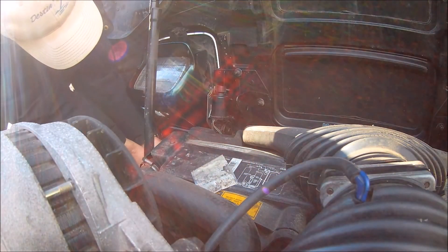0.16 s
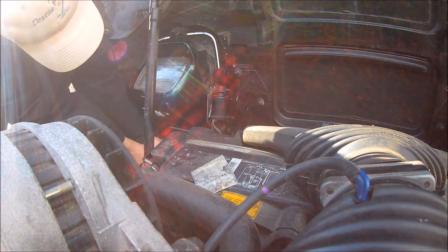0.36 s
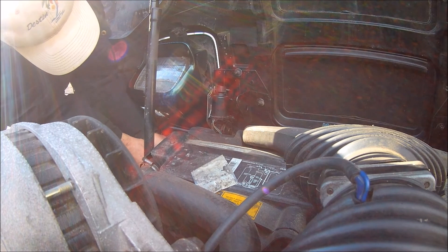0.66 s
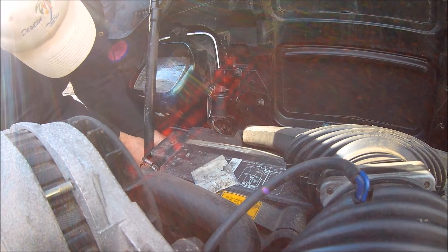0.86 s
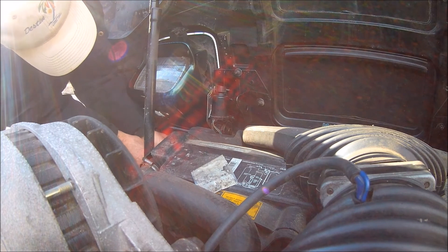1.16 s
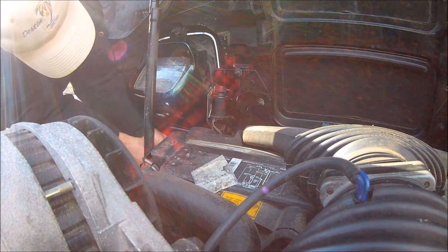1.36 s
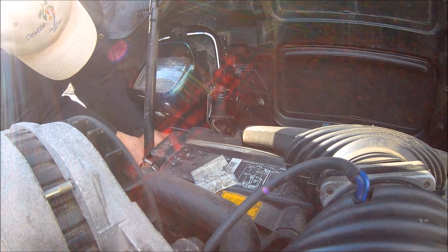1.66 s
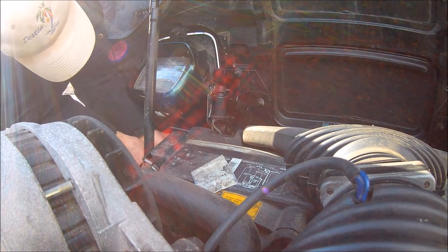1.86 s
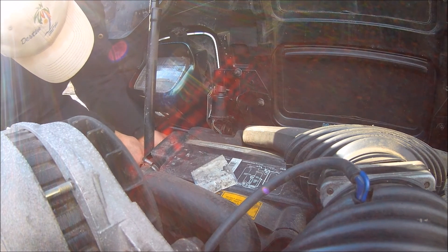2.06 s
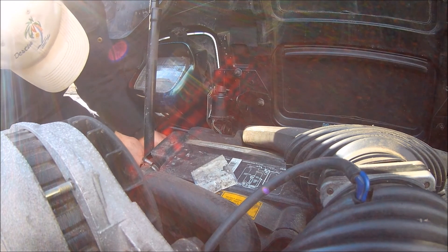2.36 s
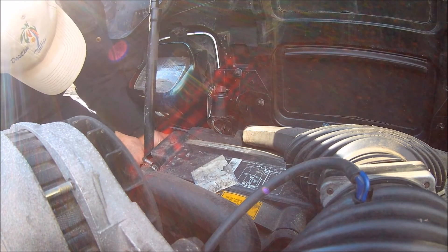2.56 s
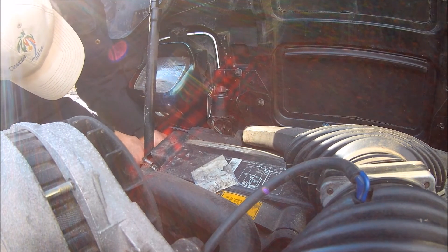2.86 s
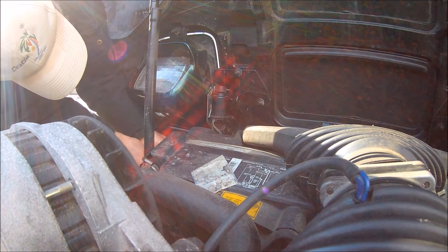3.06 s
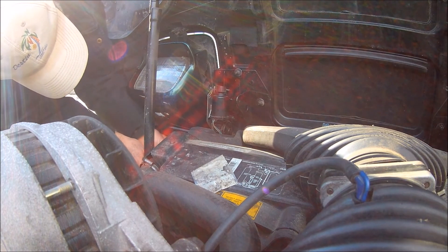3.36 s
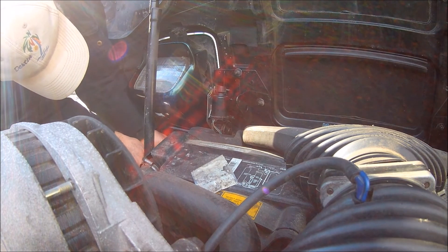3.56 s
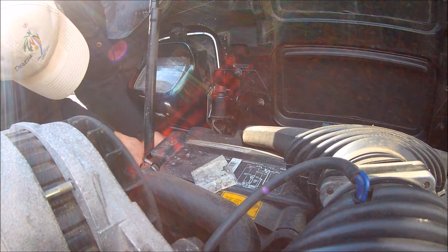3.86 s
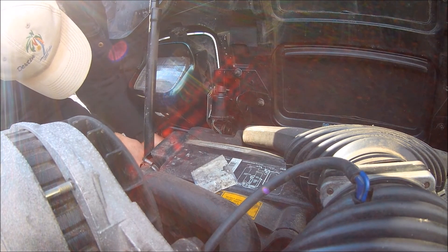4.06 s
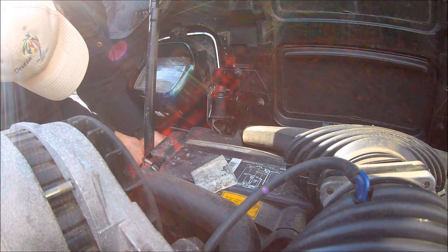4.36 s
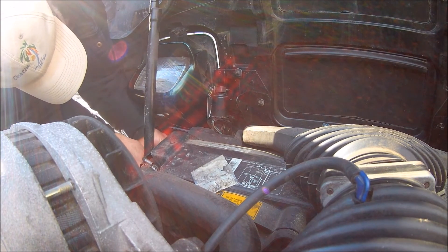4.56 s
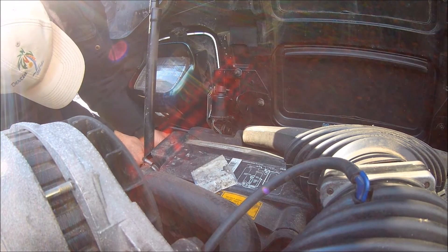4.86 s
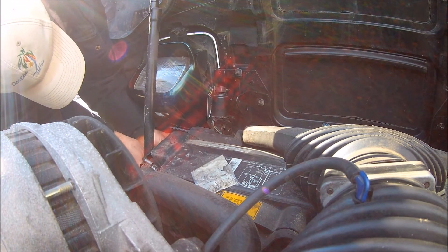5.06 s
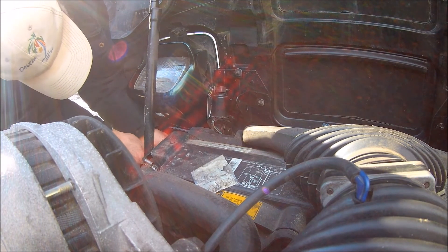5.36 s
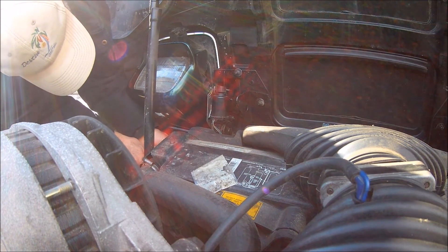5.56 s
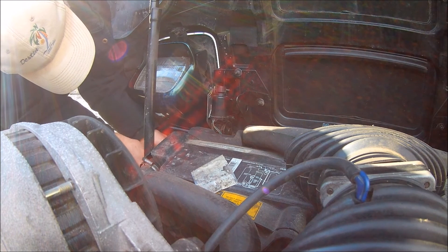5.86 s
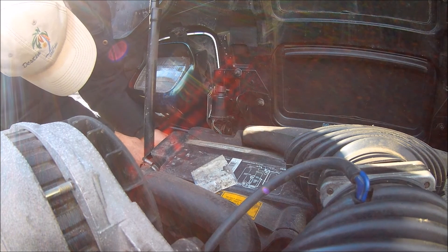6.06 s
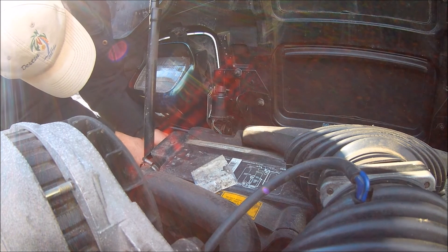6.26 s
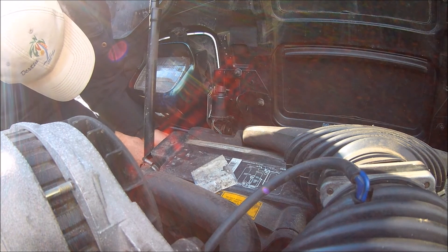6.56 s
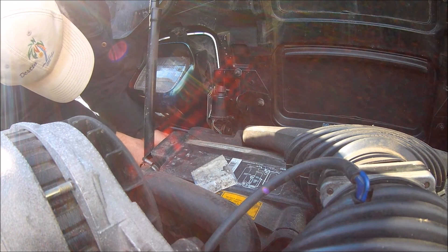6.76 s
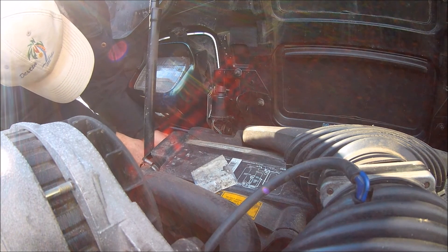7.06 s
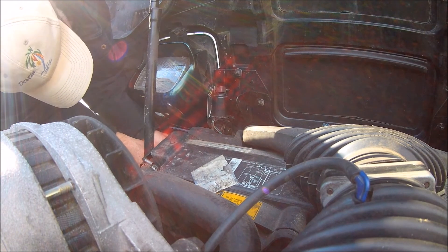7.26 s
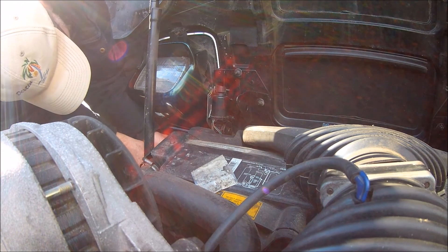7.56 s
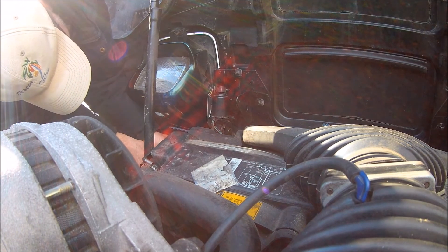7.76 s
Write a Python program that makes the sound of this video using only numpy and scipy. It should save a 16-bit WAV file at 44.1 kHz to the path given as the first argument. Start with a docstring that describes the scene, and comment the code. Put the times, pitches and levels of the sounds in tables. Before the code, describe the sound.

Irregular metal clanks and softer thuds of a socket wrench, with rapid pawl clicks before many strokes, close up above faint rumble and air gusts.

```python
"""In a truck's engine bay in a garage, a ratchet wrench tightens bolts.
On each back swing the pawl ticks over the teeth: short noise snaps plus a few ringing modes.
The socket knocks on steel, rubs on the bolt head and bumps the body: clicks set many fading tones ringing.
Behind it: a dull rumble of filtered noise, a faint wavering hum and low gusts of air on the microphone."""
import sys
import numpy as np
from scipy import signal
from scipy.io import wavfile

SR = 44100
rng = np.random.default_rng(int(sys.argv[2]) if len(sys.argv) > 2 else 0)


def dump(signal):
    """Clip the signal to [-1, 1] and save it as 16-bit WAV at the path in sys.argv[1]."""
    limited = np.clip(np.atleast_2d(signal).T, -1, 1)
    pcm = np.round(limited * 32767).astype(np.int16)
    wavfile.write(sys.argv[1], SR, pcm)


N = 349272   # length in samples
CUTOFF_HZ = 12000   # the whole sound is cut above this


def from_db(db):
    """Turn decibels into a plain factor."""
    return 10 ** (np.asarray(db) / 20)


def rms_one(x):
    """Scale a signal to rms 1."""
    return x / np.sqrt(np.mean(x ** 2) + 1e-20)


def at_hz(points, hz):
    """Read a table of (f, value) between its points, on a log-frequency axis."""
    table_hz, values = np.array(points).T
    return np.interp(np.log(hz), np.log(table_hz), values)


def drift(rate):
    """Slow random wandering of rms 1, with two random points per cycle of the rate in Hz."""
    knots = rng.standard_normal(int(N / SR * rate * 2) + 3)
    position = np.arange(N) / SR * rate * 2
    return rms_one(np.interp(position, np.arange(len(knots)), knots))


def surge(start_s, attack_s, fade_s):
    """An envelope that rises to 1 and then dies away, by 1/e in each fade time."""
    age = np.arange(N) / SR - start_s
    return np.clip(age / attack_s, 0, 1) * np.exp(-np.maximum(age - attack_s, 0) / fade_s)


def clicks(times, sizes):
    """One impulse for each contact."""
    out = np.full(N, 1e-18)   # a tiny floor keeps the filters fast
    index = np.clip(np.round(np.ravel(times) * SR).astype(int), 0, N - 1)
    np.add.at(out, index, np.ravel(sizes))
    return out


def ring(x, hz, t60):
    """A resonance: a unit click starts a sine of about height 1 that falls by 60 dB in t60 seconds."""
    r = np.exp(-np.log(1000) / (t60 * SR))
    w = 2 * np.pi * hz / SR
    return signal.lfilter([0, np.sin(w)], [1, -2 * r * np.cos(w), r * r], x)


def swell(energy, rise_s):
    """Energy takes a moment to spread through the metal."""
    r = np.exp(-1 / (rise_s * SR))
    return signal.lfilter([1 - r], [1, -r], energy)


def dying(energy, t60):
    """Amplitude envelope of energy that is put in by clicks and leaks away."""
    keep = np.exp(-2 * np.log(1000) / (t60 * SR))
    return np.sqrt(signal.lfilter([1], [1, -keep], energy))


def noise_bands(spectrum, count):
    """Noise split into bands (f, signal) that follow a spectrum and add up to about rms 1."""
    edges = np.geomspace(spectrum[0][0] / 2 ** (1 / 2), CUTOFF_HZ + 1000, count + 1)
    centres = np.sqrt(edges[1:] * edges[:-1])
    gains = from_db(at_hz(spectrum, centres))
    gains = gains / np.sqrt(np.sum(gains ** 2 * np.diff(edges)) / (SR / 2))
    white = rng.standard_normal((2, N))   # neighbouring bands use different noise
    for k, hz in enumerate(centres):
        band = signal.butter(2, edges[k:k + 2], "band", fs=SR, output="sos")
        yield hz, gains[k] * signal.sosfilt(band, white[k % 2])


def scattered_hz(low_hz, high_hz, count):
    """Mode frequencies, one somewhere in each equal step."""
    return low_hz + (high_hz - low_hz) * (np.arange(count) + rng.random(count)) / count


# colour of the garage rumble: (f/Hz, relative level/dB per Hz)
RUMBLE_SPECTRUM = [(15, -21.5), (25, -4.5), (156, -2), (243, -11), (262, -9), (298, 0.5), (331, -11.5),
                   (451, -5.5), (500, -10.5), (569, -3.5), (648, -7.5), (954, -10), (1170, -17.5),
                   (2240, -46), (12000, -51.5), (15600, -84), (22000, -120)]


def garage(level_db=-42.5, wander_db=0.5, patchy_db=1.5, drone_hz=296, drone_t60=0.15, drone_db=-51.5):
    """Dull rumble of noise bands that each waver, with one low resonance droning in it."""
    bands = noise_bands(RUMBLE_SPECTRUM, count=30)
    rumble = sum(noise * from_db(patchy_db * drift(6)) for hz, noise in bands)
    drone = rms_one(ring(rng.standard_normal(N), drone_hz, drone_t60))
    return from_db(level_db + wander_db * drift(1.2)) * rumble + from_db(drone_db) * drone


# colour of the moving air: (f/Hz, relative level/dB per Hz)
AIR_SPECTRUM = [(18, 2), (35, -6), (60, 3), (100, -9), (200, -2.5)]
# gusts on the microphone: (start t/s, time to fade by 1/e t/s, relative peak level/dB)
GUSTS = [(1.27, 0.5, -32), (1.68, .1, -35.5), (1.87, 0.093, -29), (2.24, .15, -37), (4.47, 0.097, -33),
         (5.75, .15, -37), (7.02, 0.33, -38.5)]
GUST_ATTACK_S = 0.053
CALM_DB, CALM_WANDER_DB = -49.0, 1.5   # relative level: between gusts the air barely moves


def draught(level_db=-0.5, top_hz=130, gust_hz=65, gust_db=-38.5, lumps_db=0.5):
    """Moving air buffets the microphone in lumps; the stronger the gust, the deeper it sounds."""
    air = sum(noise for hz, noise in noise_bands(AIR_SPECTRUM, count=14) if hz < 300)

    def below(hz):
        """The part of the air noise below a frequency, at rms 1."""
        return rms_one(signal.sosfilt(signal.butter(2, hz, fs=SR, output="sos"), air))

    calm, gusty = below(top_hz), below(gust_hz)
    gusts = sum((from_db(db) * surge(start, GUST_ATTACK_S, fade_s)) ** 2 for start, fade_s, db in GUSTS)
    force = np.sqrt(gusts + from_db(CALM_DB + CALM_WANDER_DB * drift(2.7)) ** 2)
    deep = force ** 2 / (force ** 2 + from_db(gust_db) ** 2)   # 0 = calm colour, 1 = deep gust colour
    loudness = force * from_db(level_db + lumps_db * deep * drift(4.4))
    return loudness * ((1 - deep) * calm + deep * gusty)


def hum(hz=75.6, waver=0.013, rest_db=-50.0, swell_db=-38.5):
    """A low sine whose pitch wavers; on top of its resting level it swells once near the end."""
    phase = 2 * np.pi * np.cumsum(hz * (1 + waver * drift(3.7))) / SR
    extra = from_db(swell_db) * surge(start_s=6.85, attack_s=0.3, fade_s=0.37)
    return (from_db(rest_db) + extra) * np.sin(phase)


# the socket rubs on the bolt head: (start t/s, end t/s, relative level/dB)
RUBS = [(3.1, 3.293, -60), (3.655, 3.777, -60), (4.644, 4.852, -52), (5.308, 5.482, -58),
        (5.481, 5.582, -54), (6.055, 6.164, -57), (6.563, 6.67, -54), (6.814, 6.853, -56),
        (7.078, 7.143, -55.5)]
# tones that the rubbing keeps ringing: (f/Hz, relative level/dB, 60 dB fade t/s)
RUB_MODES = [(1300, 8.5, 0.05), (1420, 1.5, 0.11), (1607, 6, 0.064), (1920, 8.5, 0.034), (2140, -2, 0.052),
             (2380, -12.5, 0.11), (2620, -7.5, 0.08)]


def rubbing(slips_per_s=900, level_db=-7.5):
    """Metal slides on metal in tiny uneven slips that keep a few modes ringing; the pressure swells and fades."""
    t = np.arange(N) / SR
    pressure = np.zeros(N)
    for start, end, db in RUBS:
        progress = np.clip((t - start) / (end - start), 0, 1)
        pressure += from_db(db + level_db) * np.sin(np.pi * progress)
    slipping = rng.random(N) < slips_per_s / SR
    slips = pressure * slipping * rng.standard_normal(N) + 1e-18
    return sum((-1) ** k * from_db(db) * ring(slips, hz, t60) for k, (hz, db, t60) in enumerate(RUB_MODES))


# the socket slams home, steel on steel:
# (t/s, relative level/dB, bass level/dB, bite level/dB, treble level/dB, favoured resonance f/Hz)
SLAMS = [(0.471, -19.3, -0.5, 0, -3, 1420), (1.204, -16.5, -3, -0.5, -2, 1136),
         (1.914, -32.5, -12, -7.5, -8, 1180), (2.501, -14.2, -3, -4.5, 1.5, 1030),
         (2.776, -29, 1, -2, -2.5, 1420), (4.269, -15, -3, -3, -2, 1155), (4.851, -30, 0, 0.5, -1.5, 1150),
         (5.45, -17, 0.5, 0, 3, 752), (6.26, -28, 8.5, -2, -3.5, 488), (6.655, -20, 3.5, -3, -8.5, 1430),
         (7.167, -17.5, -1, -1, -3, 1120)]
# the tool bumps softly against the body: (t/s, relative level/dB, treble level/dB)
BUMPS = [(0.947, -52, -24), (2.195, -49.5, -5), (3.286, -49.5, -15), (3.968, -40.5, -11.5),
         (4.478, -42.5, -8), (4.592, -49.5, -19), (5.266, -41.5, -26), (5.493, -37.5, 3), (6.028, -38, -22),
         (6.524, -35, -13), (6.76, -41, -8), (7.045, -40, -21), (7.289, -39.5, -8), (7.704, -40.5, -10.5)]
BUMP_BASS_DB, BUMP_BITE_DB, BUMP_HZ = 13.5, -6, 295   # a soft contact mostly wakes one low resonance


def blows():
    """Slams and soft bumps together, as columns like those of the slams."""
    soft = [(s, db, BUMP_BASS_DB, BUMP_BITE_DB, treble, BUMP_HZ) for s, db, treble in BUMPS]
    return np.transpose(list(SLAMS) + soft)


def blow_strength(hz, accent_db=5.0, accent_octaves=0.17):
    """How and where the socket or tool lands decides how strongly each blow feeds a frequency."""
    s, level, bass, bite, treble, favoured_hz = blows()
    colour = [at_hz([(380, lo), (800, 0.0), (1200, 0), (1450, mid), (2300, mid), (3200, hi)], hz)
              for lo, mid, hi in zip(bass, bite, treble)]
    accent = accent_db * np.exp(-(np.log2(hz / favoured_hz) / accent_octaves) ** 2)
    return from_db(level + colour + accent)[:, None]


# the wrench's own short bending note: (f/Hz, relative level/dB, 60 dB fade t/s)
BEND = (1090, 2.5, 0.035)


def bending(s):
    """The first contact bends the wrench, which the hand damps at once."""
    hz, db, t60 = BEND
    return ring(clicks(s, blow_strength(hz) * from_db(db)), hz, t60)


# tones of the steel around the bolt: (f/Hz, relative level/dB, 60 dB fade t/s)
STEEL = [(243.6, -16, 0.26), (294.5, -11, 0.24), (387, -22, 0.53), (446.6, -13, 0.19), (488, -9, 0.1),
         (532.3, -14, 0.11), (574.4, -11.5, 0.32), (654, -19.5, 0.083), (717, -10, 0.083),
         (754.6, -4.5, 0.075), (830, -6.5, 0.14), (866, -21.5, 0.22), (1014.5, -2.5, 0.11),
         (1055, -8.5, 0.13), (1080, -9, 0.049), (1141.5, -6.5, 0.099), (1249, -7.5, 0.065),
         (1295, -5, 0.066), (1393.4, -1, 0.08), (1567, -10.5, 0.076), (1613, -24, 0.074),
         (1770, -10.5, 0.12), (1913, -10.5, 0.11), (1970, -22.5, 0.069), (2120, -33.5, 0.12),
         (2293, -14.5, 0.12), (3517, -13.5, 0.063), (4110, -18.5, 0.064)]


def steel(contacts, level_db=3.0, rattle=0.23, scatter_db=1.5):
    """Each contact sets the strong modes of the steel ringing, the rebounds by weaker random shares."""
    out = np.zeros(N)
    for k, (hz, db, t60) in enumerate(STEEL):
        shares = rattle * rng.standard_normal(contacts.shape)
        shares[:, 0] = from_db(scatter_db * rng.standard_normal(len(contacts)))   # first contact
        sizes = shares * blow_strength(hz) * from_db(db + level_db)
        out += (-1) ** k * ring(clicks(contacts, sizes), hz, t60)
    return out


# how long the weaker modes ring: (f/Hz, 60 dB fade t/s)
CLATTER_T60 = [(150, .35), (400, 0.18), (1000, 0.099), (2800, 0.065), (7500, 0.069)]
# high ring of socket and handle: (f/Hz, relative level/dB)
CHINK = [(2400, 7.5), (3100, -12.5), (4100, 10.5), (5000, -16), (5600, 0), (6300, -7), (7200, -4),
         (8500, -14.5), (11500, -12)]


def chink(s, level_db=-16.0, build_s=.005):
    """The tool's high modes start within a few ms, in a new mix at every blow."""
    out = np.zeros(N)
    for hz in scattered_hz(CHINK[0][0], CUTOFF_HZ, count=32):
        shares = rng.standard_normal((len(s), 1)) * from_db(at_hz(CHINK, hz) + level_db)
        starts = s + build_s * rng.random(len(s))
        out += ring(clicks(starts, shares * blow_strength(hz)), hz, at_hz(CLATTER_T60, hz))
    return out


# colour of the steel's countless weaker modes: (f/Hz, relative level/dB per Hz)
CLATTER = [(90, -8.5), (170, -8.5), (300, -4), (600, 1), (1100, 2.5), (1600, -3), (2200, -6), (3000, -11),
           (4100, -19.5), (5000, -13.5), (7000, -33.5), (9000, -32), (11500, -35)]


def clatter(contacts, order, level_db=2.0, rebound_db=-3.5, spread_s=0.0012, tail_db=-28.5, tail_t60=0.32):
    """The weak modes merge into fading noise, followed by the garage's faint tail."""
    out = np.zeros(N)
    for hz, noise in noise_bands(CLATTER, count=26):
        energy = clicks(contacts, (blow_strength(hz) * from_db(level_db + rebound_db * order)) ** 2)
        energy = swell(swell(energy, spread_s), spread_s)
        tail = from_db(tail_db) * dying(energy, tail_t60)
        out += noise * np.hypot(dying(energy, at_hz(CLATTER_T60, hz)), tail)
    return out


def knocks(rebound_s=.0055):
    """Each slam or bump rebounds three times; the contacts feed the modes of steel and tool."""
    s = blows()[0]
    order = np.arange(4)   # 0 = first contact
    uneven = (order > 0) * rng.uniform(-.25, .25, (len(s), len(order)))
    contacts = s[:, None] + rebound_s * (order + uneven)
    return bending(s) + steel(contacts) + chink(s) + clatter(contacts, order)


# runs of teeth as the handle swings back:
# (start t/s, end t/s, teeth per s, relative level/dB, rise in level over the run/dB)
SWINGS = [(0.348, 0.466, 98, -49.5, 8), (1.035, 1.2, 86, -47.5, 5.5), (1.571, 1.725, 46, -50.5, -6),
          (2.351, 2.5, 115, -46, 4.5), (3.094, 3.205, 80, -51, 0), (3.21, 3.251, 120, -43.5, -4),
          (4.143, 4.262, 56, -46.5, 13), (4.673, 4.8, 72, -47.5, 0), (5.333, 5.43, 39, -50, 3),
          (6.057, 6.145, 39, -48, -2)]
# the pawl drops over a single tooth: (t/s, relative level/dB)
TICKS = [(1.773, -57.5), (1.829, -58), (3.508, -57.5), (3.662, -50.5), (3.708, -51), (3.742, -48.5),
         (3.934, -54.5), (4.496, -49), (5.868, -57), (6.565, -50), (6.624, -48), (6.837, -40), (7.099, -48)]


def teeth():
    """Every snap of the pawl as (t, level): even runs on the back swings, and single teeth."""
    rows = list(TICKS)
    for start, end, per_s, level_db, rise_db in SWINGS:
        times = np.arange(start, end, 1 / per_s)
        rows += zip(times, level_db + rise_db * np.linspace(-.5, .5, len(times)))
    return rows


# colour of the pawl's snap: (f/Hz, relative level/dB per Hz)
PAWL = [(700, 23.5), (1300, 15), (1900, 9), (2150, 0.5), (2450, 6), (3100, 0), (3900, 7), (4600, 3),
        (7000, -1.5), (9000, -13.5), (10200, 0.5), (11500, -5)]
# tones of pawl and wrench head: (f/Hz, relative level/dB, 60 dB fade t/s)
PAWL_MODES = [(1925, 2, 0.046), (2450, 0.5, 0.06), (3876, -4.5, 0.056), (3770, -3, 0.1), (5430, -6, 0.045),
              (6830, -6.5, 0.044), (6960, -7.5, 0.034), (10440, -13, .025), (11400, -9, 0.046)]


def ratchet(level_db=7.0, modes_db=-6.5, rise_s=0.0013, uneven_s=.0003, uneven_db=1.5):
    """The pawl snaps into one tooth after another and rings; the engine bay draws each snap out a little."""
    snap_t60, bay_db, bay_t60 = .036, -9.0, .11
    s, tooth_db = np.transpose(teeth())
    chance = rng.standard_normal((len(s), 2))
    s = s + uneven_s * chance[:, 0]
    size = from_db(tooth_db + uneven_db * chance[:, 1])
    energy = swell(clicks(s, (size * from_db(level_db)) ** 2), rise_s)
    envelope = np.hypot(dying(energy, snap_t60), from_db(bay_db) * dying(energy, bay_t60))
    snaps = envelope * sum(noise for hz, noise in noise_bands(PAWL, count=24))
    rings = np.zeros(N)
    for hz, db, t60 in PAWL_MODES:
        shares = size * rng.standard_normal(len(s))
        rings += ring(clicks(s, shares * from_db(db + modes_db)), hz, t60)
    return snaps + rings


def treble_dip(x, hz=8050, width_hz=600):
    """A band-stop filter leaves a narrow hollow in the treble of the wrench's sound."""
    edges = [hz - width_hz / 2, hz + width_hz / 2]
    return signal.sosfilt(signal.butter(2, edges, "bandstop", fs=SR, output="sos"), x)


def scene():
    """Garage, air and hum behind, wrench in front, as one channel."""
    background = garage() + draught() + hum()
    wrench = rubbing() + treble_dip(knocks() + ratchet())
    return (background + wrench)[None]


def record(dry, top=1.1):
    """The highest peaks are rounded, then a steep low-pass cuts the top."""
    rounded = top * np.tanh(dry / top)
    return signal.sosfilt(signal.ellip(10, .2, 70, CUTOFF_HZ, fs=SR, output="sos"), rounded)


dry = scene()
out = record(dry)
dump(out)
```